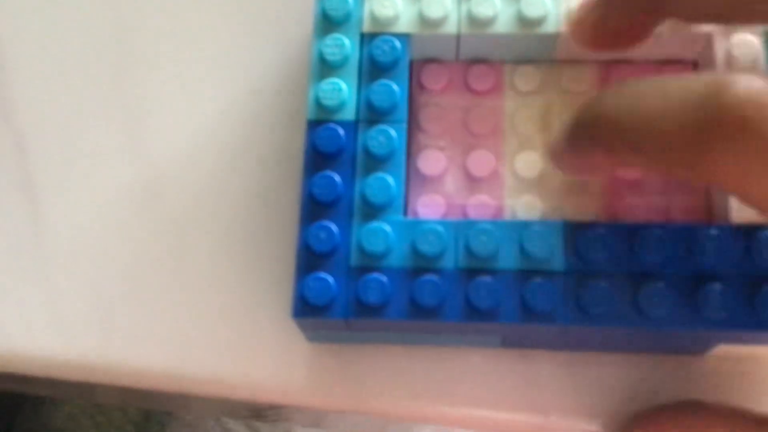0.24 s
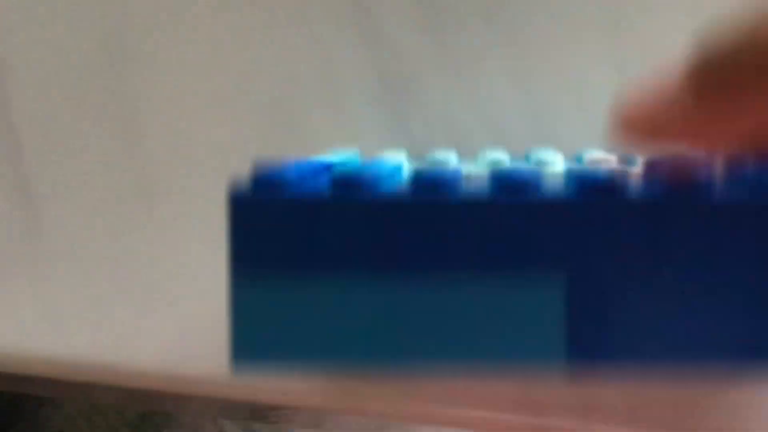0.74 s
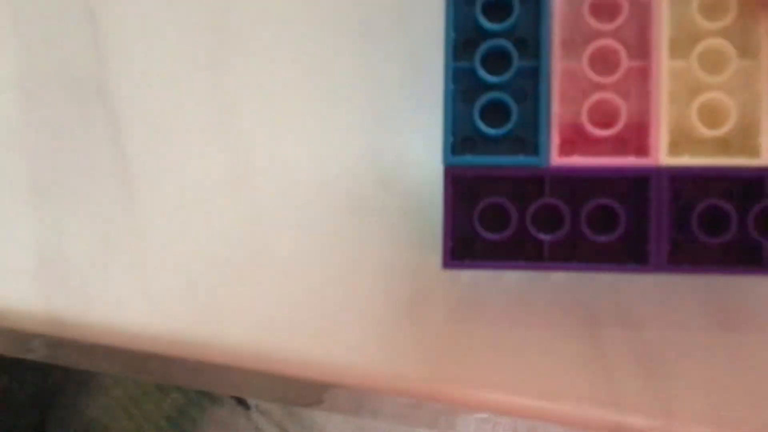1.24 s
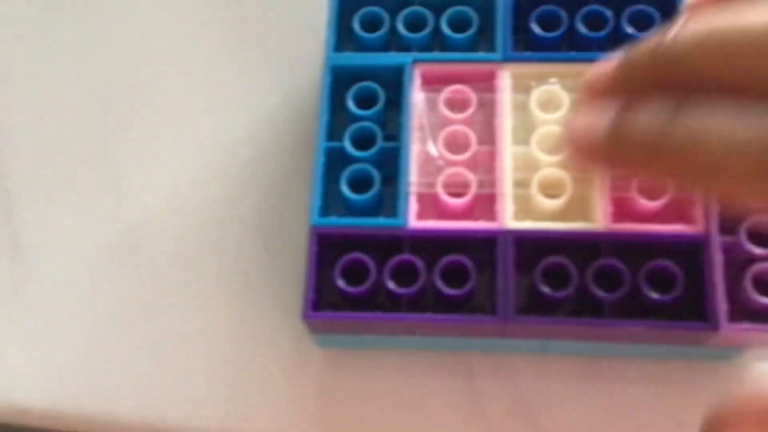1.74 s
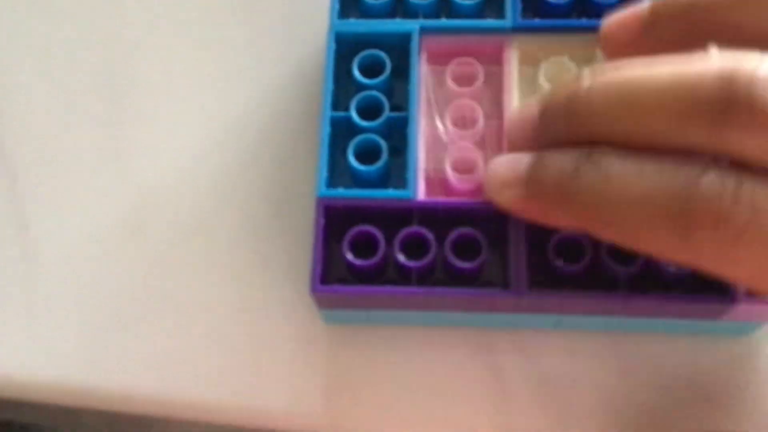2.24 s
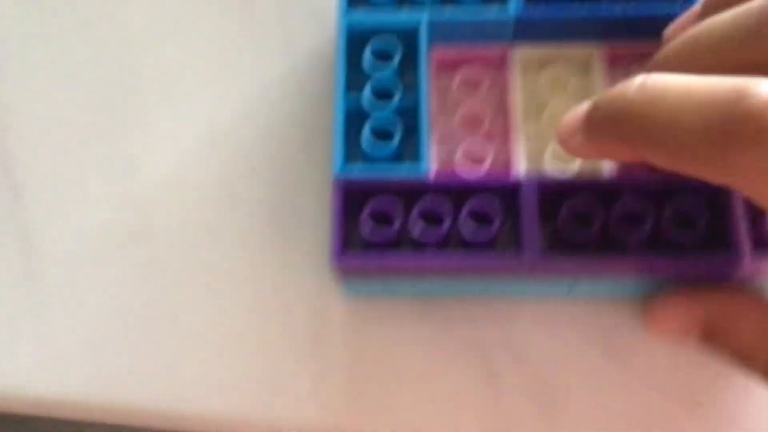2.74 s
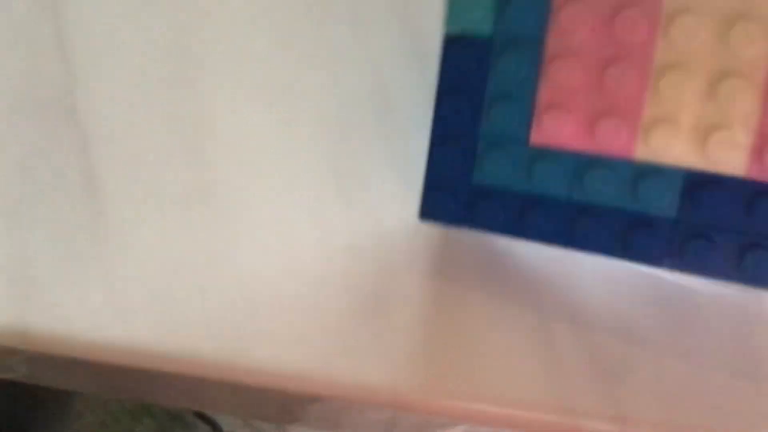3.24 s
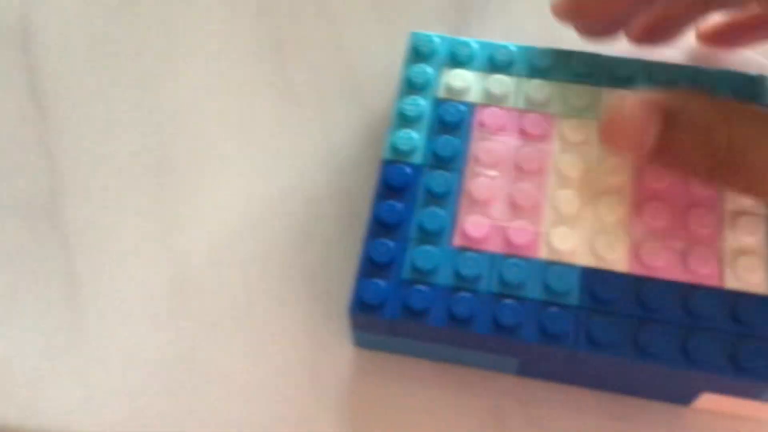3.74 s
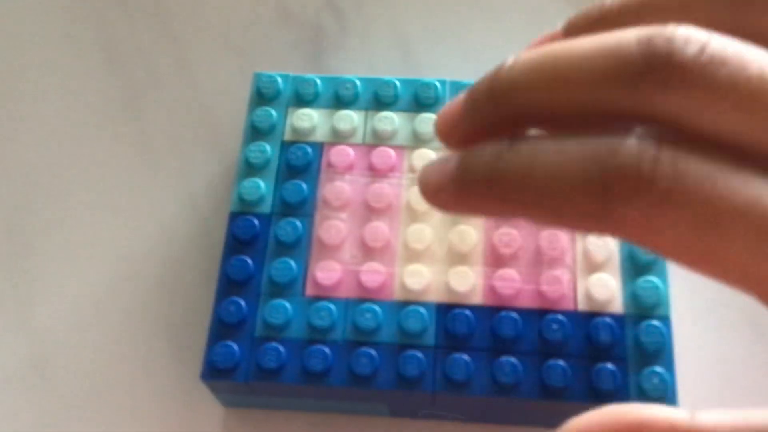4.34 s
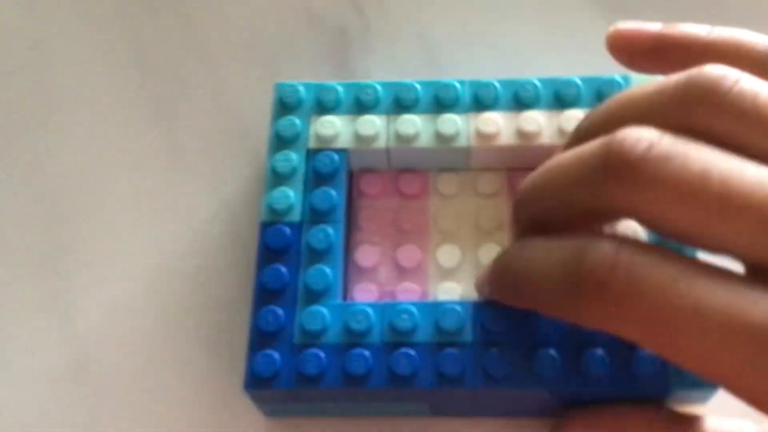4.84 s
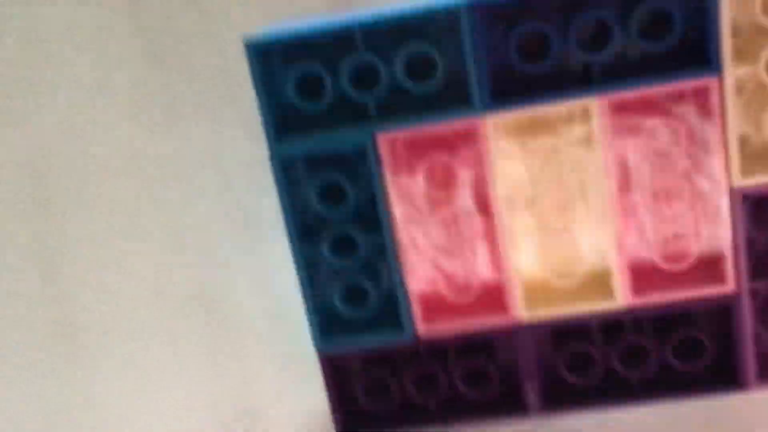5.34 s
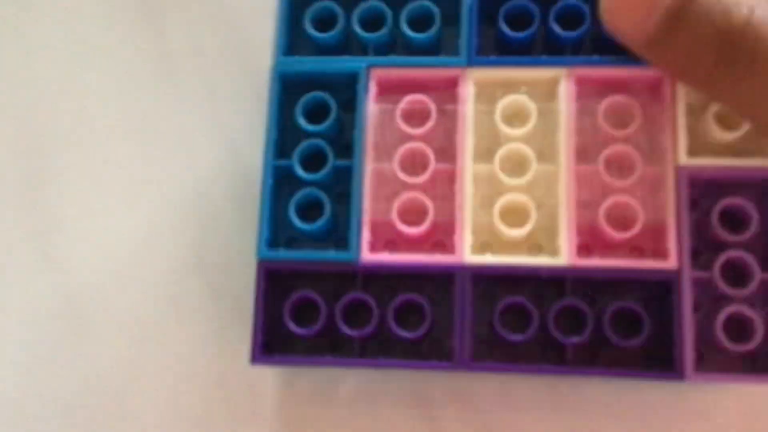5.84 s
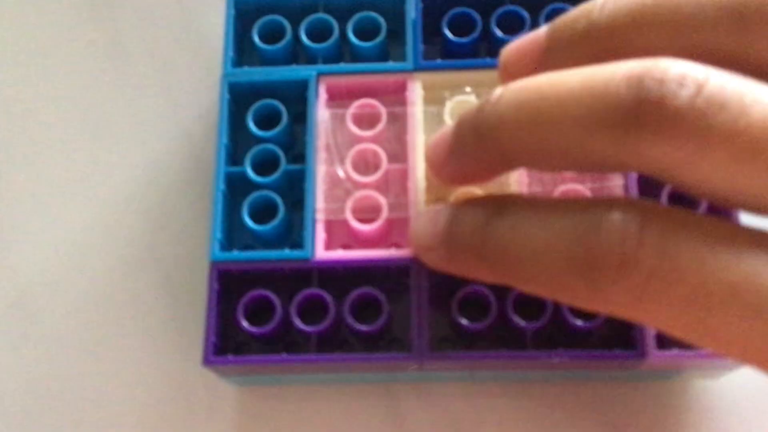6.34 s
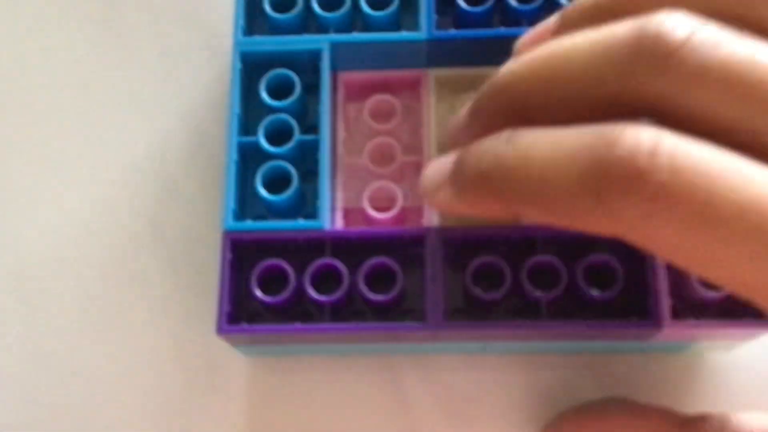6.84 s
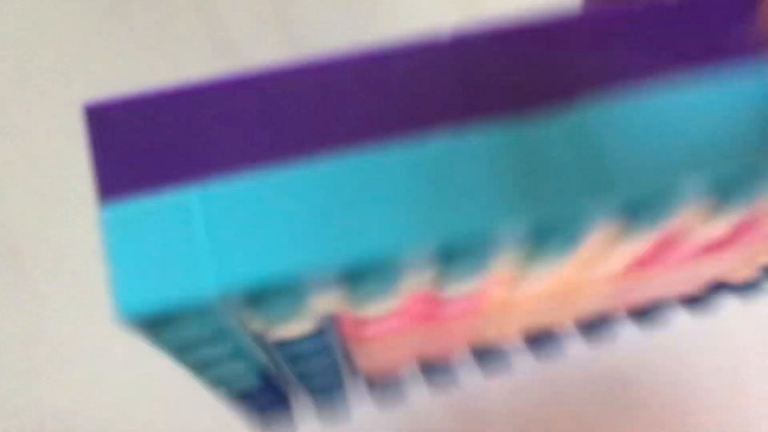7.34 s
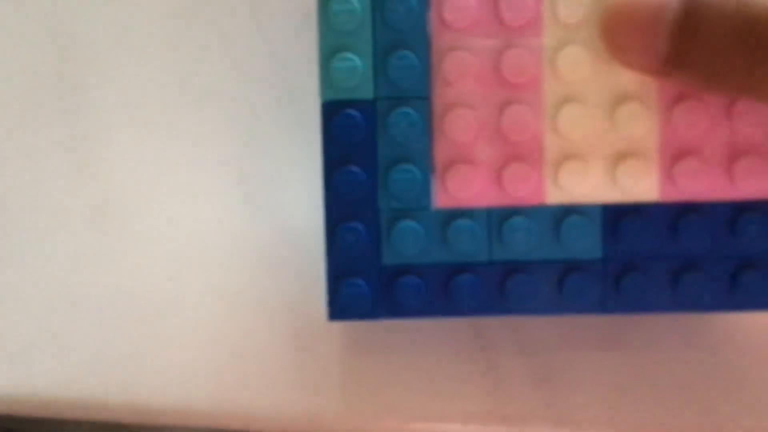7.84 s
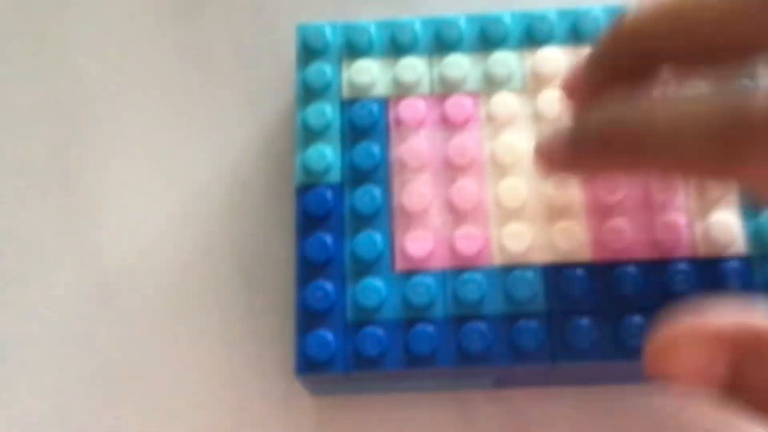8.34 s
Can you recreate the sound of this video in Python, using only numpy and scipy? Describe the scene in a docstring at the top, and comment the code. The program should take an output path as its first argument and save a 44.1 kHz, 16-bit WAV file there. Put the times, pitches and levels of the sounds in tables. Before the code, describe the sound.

A hand-held plastic brick toy snaps, scrapes briefly and clacks down on a hard tabletop, with silence and faint low rumble between the hits.

```python
"""Hollow brick toy handled on a table

Fingers press the sliding middle of a plastic brick toy through its frame, flip it and set it down.
Each blow sums a frame thud, decaying brick modes and noise bursts; tabletop modes ring on longer.
Slides are swarms of tiny contacts; a noise response with echoes makes the small quiet room.
Below lie soft handling rumble, air noise, a thin whine and two faint far whistles."""
import sys
import numpy as np
from scipy import signal
from scipy.fft import rfft, irfft
from scipy.io import wavfile

SR = 44100
rng = np.random.default_rng(int(sys.argv[2]) if len(sys.argv) > 2 else 0)


def inscribe(sig):
    """Save sig as 16-bit PCM at rate SR to the path in sys.argv[1].

    A 1-D sig is mono; a 2-D sig holds one channel per row.
    Samples are clipped to [-1, 1] before scaling.
    """
    pcm = np.round(np.clip(np.atleast_2d(sig).T, -1, 1) * 32767)
    wavfile.write(sys.argv[1], SR, pcm.astype(np.int16))


N = 378798  # samples

# still air and hiss, spectral shape: (frequency [Hz], relative density [dB])
AIR_SPECTRUM = [(15, -53), (28, -28.5), (45, -12.5), (66, 3), (100, -4), (150, -8.5), (330, -12.5),
                (450, -17.5), (900, -26.5), (2000, -32.5), (4500, -33.5), (7300, -38.5), (8600, -37),
                (13500, -43), (15500, -37.5)]
# far whistles: (time [s], length [s], pitch [Hz], nominal level [dB])
WHISTLES = [(1.725, .17, 2614, -85), (1.997, 0.21, 2600, -89.5)]
# grip shifts: (middle [s], rumble level [dB])
GRIPS = [(.48, -62.5), (1.08, -65), (1.651, -69), (2.32, -70), (3.02, -63.5), (3.521, -64.5), (3.92, -74),
         (5.3, -76), (7.28, -71.5), (8.35, -67.5)]
# room tail colour: (frequency [Hz], relative level [dB])
ROOM_COLOUR = [(80, -6.5), (240, 1.5), (500, -3), (850, -6), (1200, 1.5), (2000, -4.5), (3000, 0),
               (5000, -1.5), (6000, -1.5), (6500, 3), (7100, -5), (9000, -2.5), (15000, -2.5)]
# distinct wall echoes: (delay [s], level [dB])
ECHOES = [(0.0115, -23.5), (0.0218, -25.5), (.104, -35.5)]
# tabletop modes: (frequency [Hz], relative level [dB], T60 [s])
TABLETOP_MODES = [(266, -9.5, 0.26), (310, -2, .32), (355, -12.5, 0.25), (405, -14, 0.096),
                  (482.3, -1, 0.2), (563, -22, 0.28), (674.6, -3, .26), (793, -15, 0.073),
                  (994, -18.5, 0.16)]
# brick modes, from hollow shell to edges: (frequency [Hz], relative level [dB], T60 [s])
BRICK_MODES = [(1180, -13.5, 0.021), (1326, -8.5, 0.023), (1576, 1, 0.017), (1880, -6.5, 0.016),
               (2350, -6, 0.018), (2800, -5, 0.013), (3419, -0.5, 0.01), (3700, -1.5, .014),
               (4210, -2.5, 0.01), (5170, -3.5, 0.011), (6440, 0, 0.022), (7300, -0.5, 0.014),
               (8750, -5, 0.014)]
# limits of the shell, wall and edge registers: (bottom, shell/wall, wall/edge, top [Hz])
REGISTER_HZ = (0, 2200, 5200, 16000)
# bricks rubbing as they slide: (time [s], length [s], level [dB])
SLIDES = [(0.523, 0.015, -44.5), (2.2, 0.015, -32.5), (2.227, .028, -28.5), (2.774, .022, -52),
          (2.985, 0.018, -40.5), (4.511, .041, -37), (4.882, 0.022, -44), (5.137, .045, -43),
          (5.889, .018, -29), (6.544, .026, -25), (7.848, 0.027, -45.5)]
# fingertips on loose bricks: (time [s], strength [dB])
TAPS = [(0.3386, -57), (0.5245, -50.5), (0.655, -61.5), (2.207, -44.5), (2.2389, -40.5), (2.9889, -50),
        (4.8924, -50), (4.9025, -52.5), (4.9222, -57), (4.9944, -58.5), (5.0284, -59.5), (6.524, -56),
        (6.554, -42.5), (7.5734, -48), (7.583, -49.5), (7.593, -49.5)]
# sliding middle hits its stop: (time [s], strength [dB], wall snap re strength [dB],
# frame thud re strength [dB])
STOPS = [(2.2586, -35, 16.5, -1), (4.5459, -29.5, 3, 18.5), (6.57, -19.5, 17, -8.5)]
# knocks: toy tipped over and set down on the table, or its middle dropping back into the frame:
# (time [s], strength [dB], hardness: edges up, shell down [dB],
# weight: frame thud re strength [dB], tabletop ring [dB])
KNOCKS = [(0.8537, -25.5, 0, -2.5, -15.5), (0.8987, -39, -3, 13.5, -23), (1.1938, -31, -8, -6.5, -28),
          (1.444, -5.5, 1.5, -9, -9.5), (3.0679, -33.5, -1, 2, -22), (3.3888, -15, -6, -3, -17),
          (3.6752, -10, -3.5, 7.5, -7), (4.5086, -35, -10.5, 16, -24.5), (5.141, -46.5, -7, 12, -24.5),
          (5.176, -40.5, -8.5, 11, -20.5), (5.433, -33, -10.5, -5, -27), (5.885, -24, -4, -16, -22),
          (5.9333, -4, -2.5, -17.5, -12.5), (7.265, -41.5, -8, 8, -38.5), (7.4786, -21.5, -2, -0.5, -13.5),
          (8.0755, -7, 0, 6.5, -5.5), (8.5694, -62, -3, 29.5, -28.5), (8.581, -41, -1, 9, -30.5)]

AIR_DB, WHINE_HZ, WHINE_DB = -69, 1680, -96.5
GRIP_S, HOLD_DB = 0.11, -78.5  # shift half length; rumble of a resting hand
ROOM_DB, ROOM_T60_S = -16, 0.26
LATE_DB, LATE_T60_S = -20.5, 0.71  # longer tail, re the short one
ROOM_TREBLE_HZ, ROOM_TREBLE_T60_S = 7500, 0.7  # extra decay above this pitch
SLIDE_BRIGHT_DB = -4  # edge hiss re shell
# loose bricks rattle after a blow; level follows its shell
SETTLE_DELAY_S, SETTLE_S, SETTLE_DB, SETTLE_BRIGHT_DB = 0.0071, 0.0052, -15, -8
TAP_HARDNESS_DB, TAP_WEIGHT_DB, TAP_THUD_HZ, TAP_TABLE_DB = -13.5, 8, 575, 8.5
# a gentler push ends in a duller snap
STOP_HARDNESS_AT_0_DB, STOP_HARDNESS_PER_DB = 4.5, 0.2866
STOP_THUD_HZ, STOP_TABLE_DB = 756, 2.5
# a light knock thuds high, like a corner; past a certain weight it thuds low, like the whole toy
CORNER_HZ, FLAT_HZ, FLAT_FROM_DB, FLAT_BLEND_DB = 696, 434, 3.5, 3
FLAT_MUFFLE_DB = 6  # lying flat, the table closes the hollow shell
CRACK_DB, WALL_DB = -10.5, 1  # crack re edges; wall snap re strength
GRIT, GRIT_PER_DB = 0.88, 0.22  # shell noise gain at edge = shell; its dB per dB of edge over shell
TOP_HZ = 16100


def undb(db):
    """Decibels to amplitude gain."""
    return 10 ** (np.asarray(db) / 20)


def unit(x):
    """Scale a short sound to energy 1."""
    return x / np.sqrt(np.sum(x ** 2))


def fade(t, t60_s):
    """Exponential decay, 60 dB down after t60_s."""
    return np.exp(-np.log(1000) * t / t60_s)


def seconds(length_s):
    """Time axis of a short sound."""
    return np.arange(int(length_s * SR)) / SR


def add(track, start_s, sound):
    """Mix a sound into the track, cut at the track's end."""
    i = int(start_s * SR)
    track[i:i + len(sound)] += sound[:max(N - i, 0)]


def band(x, low_hz, high_hz, order=2):
    """Causal band-pass."""
    edges_hz = [low_hz, min(high_hz, SR / 2 - 100)]
    return signal.sosfilt(signal.butter(order, edges_hz, "band", fs=SR, output="sos"), x)


def noise(points, size):
    """Noise of rms 1, its spectrum interpolated over log frequency from (Hz, dB) points."""
    hz, db = np.transpose(points)
    f_hz = np.maximum(np.fft.rfftfreq(size, 1 / SR), 1)
    gain = undb(np.interp(np.log(f_hz), np.log(hz), db))
    x = irfft(rfft(rng.standard_normal(size)) * gain, size)
    return x / x.std()


def crack(t, low_hz, high_hz, t60_s):
    """A dying burst of noise: many tiny contacts or crowded modes."""
    burst = rng.standard_normal(len(t)) * fade(t, t60_s)
    return unit(band(burst, low_hz, high_hz))


def tap(t, low_hz, high_hz):
    """One instant contact, heard in a band."""
    impulse = 1. * (t == 0)
    return unit(band(impulse, low_hz, high_hz))


def brick(t, low_hz, high_hz, detune=0.02, scatter_db=2.0, lag_s=0.0002):
    """Brick modes of one register; where the blow lands shifts their pitch, strength and timing."""
    out = 0
    for hz, db, t60_s in BRICK_MODES:
        if low_hz <= hz < high_hz:
            age = np.maximum(t - lag_s * rng.random(), 0)
            pitch_hz = hz * (1 + detune * rng.standard_normal())
            size = rng.choice([-1, 1]) * undb(db + scatter_db * rng.standard_normal())
            out = out + size * np.sin(2 * np.pi * pitch_hz * age) * fade(age, t60_s)
    return unit(out)


def background(waver=0.0036, flutter_db=6.0):
    """Still air, a thin steady whine and two far whistles that flutter in pitch and level."""
    air = undb(AIR_DB) * noise(AIR_SPECTRUM, N)
    whine = undb(WHINE_DB) * np.sqrt(2) * np.sin(2 * np.pi * WHINE_HZ * np.arange(N) / SR)
    out = air + whine
    for start_s, length_s, hz, db in WHISTLES:
        t = seconds(length_s)
        pitch_hz = hz * (1 + waver * noise([(20, 0), (200, -59)], len(t)))
        flutter = flutter_db * noise([(35, 0), (150, -60)], len(t))
        size = undb(db + flutter) * np.sin(np.pi * t / length_s)
        add(out, start_s, size * np.sqrt(2) * np.sin(2 * np.pi * np.cumsum(pitch_hz) / SR))
    return out


def grip():
    """Rumble gain of the hand: a resting hold that swells at each change of grip."""
    t = np.arange(N) / SR
    shifts = sum(undb(db) * np.exp(-((t - middle_s) / GRIP_S) ** 2) for middle_s, db in GRIPS)
    return undb(HOLD_DB) + shifts


def handling(ticks_per_s=16, tick_db=4, spread_db=3, jerk_db=3.0):
    """Fingers rumble on the frame in little jerks and make loose bricks tick faintly."""
    jerks = undb(jerk_db * noise([(12, 0.5), (40, -40.5), (200, -100)], N))
    rumble = noise([(15, -49.5), (35, -21.5), (70, 0), (130, 2), (200, -1.5), (330, -11.5),
                    (700, -27), (2000, -36.5), (12000, -53)], N)
    slip_size = undb(tick_db + spread_db * rng.standard_normal(N))
    slips = (rng.random(N) < ticks_per_s / SR) * slip_size
    t = seconds(0.04)
    one_tick = unit(brick(t, *REGISTER_HZ[0:2]) + crack(t, 890, 7000, t60_s=0.015))
    ticks = signal.fftconvolve(slips, one_tick)[:N]
    return grip() * (jerks * rumble + ticks)


def room(x, first_s=0.0019, build_s=0.0036, grain_db=2):
    """Wall echoes over a short, lumpy diffuse tail and a weak longer one; the treble dies first."""
    t = seconds(0.8)
    swell = 1 - np.exp(-np.maximum(t - first_s, 0) / build_s)
    lumps = undb(grain_db * noise([(300, -0.5), (1500, -38.5)], len(t)))
    decay = fade(t, ROOM_T60_S) + undb(LATE_DB) * fade(t, LATE_T60_S)
    response = undb(ROOM_DB) * unit(noise(ROOM_COLOUR, len(t)) * swell * lumps * decay)
    for delay_s, db in ECHOES:
        response[int(delay_s * SR)] += undb(db)
    low_pass = signal.butter(3, ROOM_TREBLE_HZ, fs=SR, output="sos")
    lows = signal.sosfiltfilt(low_pass, response)
    treble = (response - lows) * fade(t, ROOM_TREBLE_T60_S)
    return signal.fftconvolve(x, lows + treble)[:N]


def tabletop(thud_hz, reach_octaves=2.7, rise_s=0.003, scatter_db=3.0, wash=0.26):
    """The slab's low modes swell after a blow and ring on; those near the thud pitch take up most."""
    t = seconds(0.5)
    modes = 0
    for hz, db, t60_s in TABLETOP_MODES:
        coupling = 1 / (1 + (np.log2(hz / thud_hz) / reach_octaves) ** 2)
        size = undb(db + scatter_db * rng.standard_normal()) * coupling
        modes = modes + size * np.sin(2 * np.pi * (hz * t + rng.random())) * fade(t, t60_s)
    ring = unit(modes) + wash * crack(t, 170, 750, t60_s=0.28)
    return unit(ring * (1 - np.exp(-t / rise_s)))


def scrape(length_s, bright_db, slips_per_s=1100, spread_db=4):
    """Stick and slip: a swarm of uneven contacts rings the hollow shell and hisses on the edges."""
    t, span = seconds(0.03), seconds(length_s)
    slip_size = undb(spread_db * rng.standard_normal(len(span)))
    slips = (rng.random(len(span)) < slips_per_s / SR) * slip_size
    envelope = np.sqrt(np.sin(np.pi * span / length_s))
    drive = (slips + 0.07) * rng.standard_normal(len(span)) * envelope
    shell = brick(t, *REGISTER_HZ[0:2]) + 0.39 * crack(t, 1000, 1800, t60_s=0.013)
    shell = unit(band(shell, 670, 1900))
    hiss = undb(bright_db) * crack(t, 2300, 5400, t60_s=0.003)
    return unit(signal.fftconvolve(drive, shell + hiss))


def thud(t, hz, cycles=3.9, rise_s=0.0001, flex_hz=790, flex=0.17, flex_t60_s=0.0099):
    """The whole toy bumps, a swing that is gone after a few cycles, and its frame flexes."""
    swing = np.sin(2 * np.pi * hz * t) * fade(t, cycles / hz)
    bend = flex * np.sin(2 * np.pi * flex_hz * t) * fade(t, flex_t60_s)
    return unit(band((swing + bend) * (1 - np.exp(-t / rise_s)), 180, 1200))


def all_round(thud_db, thud_hz, shell_db, snap_db, tick_db, crack_db):
    """A blow as the room hears it: over all faces of the toy the modes merge into smooth bands."""
    t = seconds(0.03)
    out = undb(thud_db) * thud(t, thud_hz)
    out = out + 0.75 * undb(shell_db) * tap(t, 1280, 1700)
    out = out + undb(snap_db) * tap(t, 2200, 4000)
    out = out + undb(tick_db) * tap(t, 5300, 7600)
    return out + undb(crack_db) * tap(t, 8800, 18000)


def click(thud_db, thud_hz, shell_db, snap_db, tick_db, crack_db):
    """One blow: frame thud, three registers of brick modes, a sharp contact trailed by tiny ones."""
    t = seconds(0.06)
    frame = unit(thud(t, thud_hz) + 0.3 * crack(t, 190, 1200, t60_s=0.028))
    # a soft touch rings the hollow shell cleanly, a hard one makes it crack
    grit = GRIT * undb(GRIT_PER_DB * (tick_db - shell_db))
    shell = brick(t, *REGISTER_HZ[0:2]) + grit * crack(t, 1300, 2000, t60_s=0.006)
    snap = brick(t, *REGISTER_HZ[1:3]) + 0.81 * crack(t, 2500, 4900, t60_s=0.014)
    snap = snap + 0.6 * tap(t, 2000, 6300)
    tick = brick(t, *REGISTER_HZ[2:4]) + 0.43 * crack(t, 6200, 8800, t60_s=0.013)
    tick = tick + 0.71 * tap(t, 4200, 9000)
    # small plastic parts radiate little below their own modes
    shell = unit(band(shell, 1100, 2300))
    snap = unit(band(snap, 2300, 5400))
    tick = unit(band(tick, 4600, 9500))
    contact = crack(t, 8500, 21000, t60_s=0.01) + 0.5 * tap(t, 9200, 13000)
    contact = unit(contact + 0.4 * crack(t, 13000, 16000, t60_s=0.011))
    out = undb(thud_db) * frame + undb(shell_db) * shell + undb(snap_db) * snap
    return out + undb(tick_db) * tick + undb(crack_db) * contact


def registers(db, hardness_db, wall_db, muffle_db=0):
    """Shell, wall, edge and crack dB: a harder contact moves energy from the shell to the edges."""
    edge_db = db + hardness_db
    return db - hardness_db - muffle_db, db + wall_db, edge_db, edge_db + CRACK_DB


def flatness(weight_db):
    """Near 0 for a light, corner-like knock, near 1 for a heavy, flat one."""
    return (1 + np.tanh((weight_db - FLAT_FROM_DB) / FLAT_BLEND_DB)) / 2


def blows():
    """Every knock, stop and tap as (time [s], thud [dB], thud [Hz], registers [dB], tabletop [dB])."""
    for start_s, db, hardness_db, weight_db, table_db in KNOCKS:
        flat = flatness(weight_db)
        thud_hz = CORNER_HZ + flat * (FLAT_HZ - CORNER_HZ)
        brick_db = registers(db, hardness_db, WALL_DB, flat * FLAT_MUFFLE_DB)
        yield start_s, db + weight_db, thud_hz, brick_db, table_db
    for start_s, db, wall_db, weight_db in STOPS:
        hardness_db = STOP_HARDNESS_AT_0_DB + STOP_HARDNESS_PER_DB * db
        brick_db = registers(db, hardness_db, wall_db)
        yield start_s, db + weight_db, STOP_THUD_HZ, brick_db, db + STOP_TABLE_DB
    for start_s, db in TAPS:
        brick_db = registers(db, TAP_HARDNESS_DB, WALL_DB)
        yield start_s, db + TAP_WEIGHT_DB, TAP_THUD_HZ, brick_db, db + TAP_TABLE_DB


def scene(front_share=0.3):
    """Toy, rubbing and tabletop heard directly, the room's answer, and the ambience."""
    toy, radiated, table, rubs = np.zeros((4, N))
    ambience = handling() + background()
    for start_s, thud_db, thud_hz, brick_db, table_db in blows():
        add(toy, start_s, click(thud_db, thud_hz, *brick_db))
        add(radiated, start_s, all_round(thud_db, thud_hz, *brick_db))
        add(table, start_s, undb(table_db) * tabletop(thud_hz))
        settle_gain = undb(brick_db[0] + SETTLE_DB)
        add(rubs, start_s + SETTLE_DELAY_S, settle_gain * scrape(SETTLE_S, SETTLE_BRIGHT_DB))
    for start_s, length_s, db in SLIDES:
        add(rubs, start_s, undb(db) * scrape(length_s, SLIDE_BRIGHT_DB))
    reverb = room(radiated + front_share * toy + rubs)
    return (toy + rubs + table + reverb + ambience)[None]


def record(dry):
    """Steep elliptic low-pass that cuts the top above TOP_HZ."""
    return signal.sosfilt(signal.ellip(10, 0.2, 70, TOP_HZ, fs=SR, output="sos"), dry)


dry = scene()
out = record(dry)
inscribe(out)
```